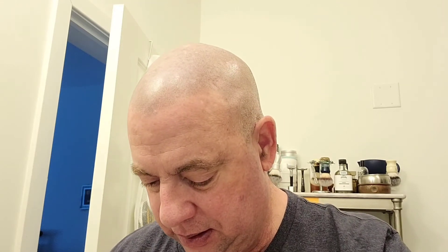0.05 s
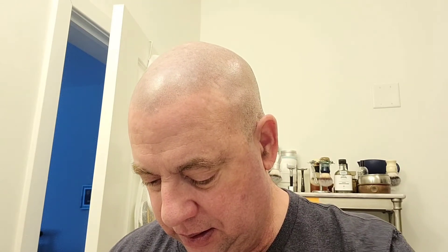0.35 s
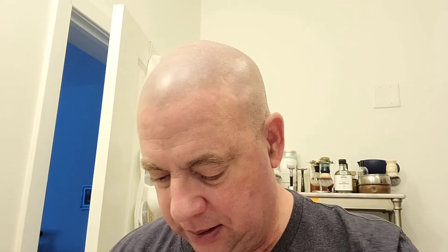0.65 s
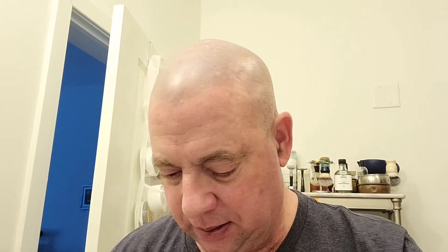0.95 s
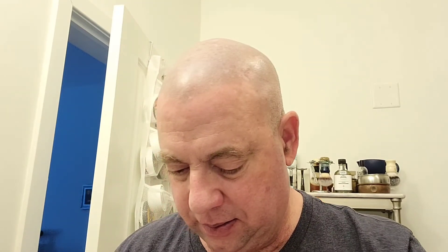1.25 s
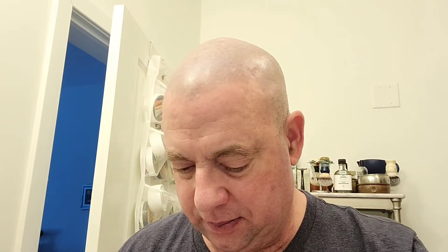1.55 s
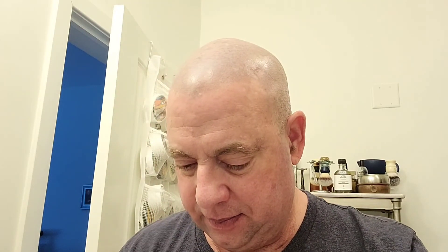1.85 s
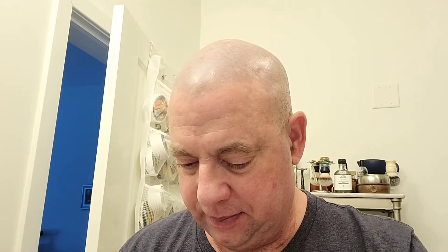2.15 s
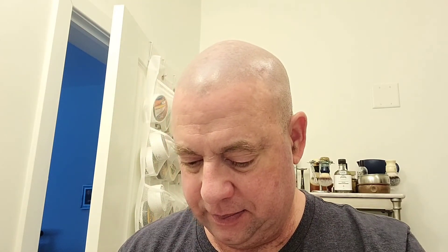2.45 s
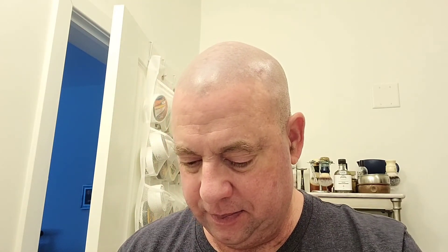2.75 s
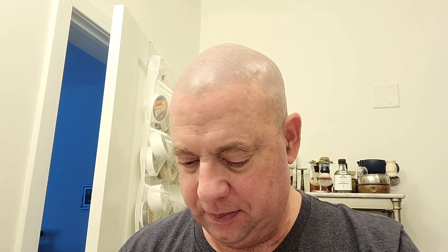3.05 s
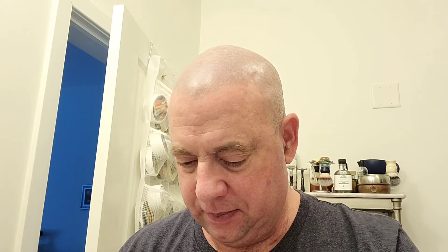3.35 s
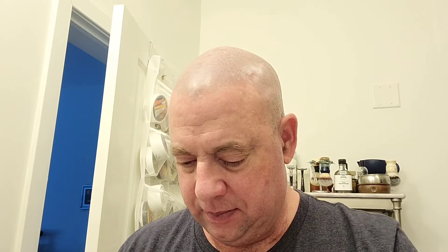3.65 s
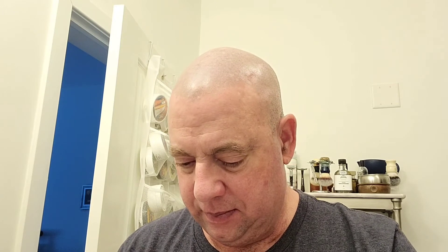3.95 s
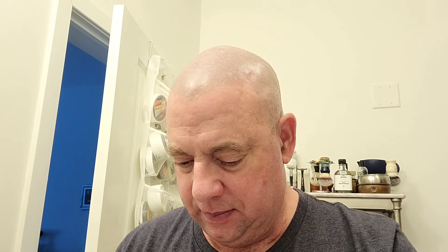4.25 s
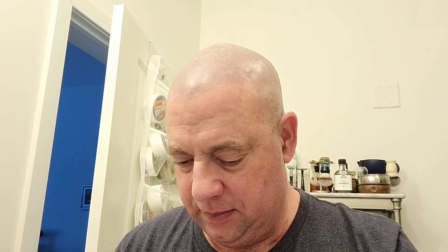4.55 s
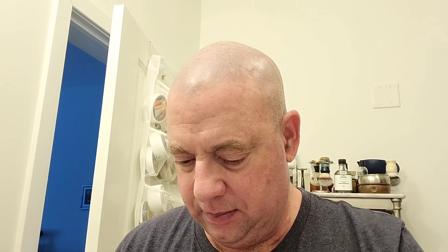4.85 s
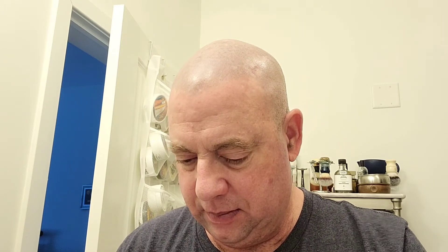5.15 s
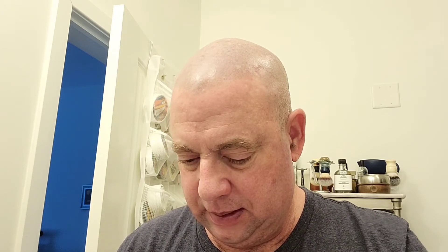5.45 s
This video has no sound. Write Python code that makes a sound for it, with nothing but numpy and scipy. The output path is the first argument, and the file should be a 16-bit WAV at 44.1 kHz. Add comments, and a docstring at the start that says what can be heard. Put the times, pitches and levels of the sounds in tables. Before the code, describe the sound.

A box scrapes across a table, judders and is set down with a booming thud. Thin wrapping then rustles softly under the fingers, with small clicks. Stiff packaging snaps and tears in a few sharp bursts, and the last one ends with a knock on the table. The microphone is close to the hands in a small, hard-walled kitchen with a faint appliance hum.

```python
"""Unpacking at a kitchen table

Close perspective: hands work just below a phone's two microphones in a small, hard kitchen that rings
briefly over a faint appliance hum. A box slides, catches, judders and is put down with a thud that booms
in the table. Thin wrapping rustles as it sticks and slips under the fingers; stiff packaging snaps and
tears open in bursts, and something knocks on the table at the end."""
import sys
import numpy as np
from scipy import signal
from scipy.fft import rfft, irfft
from scipy.io import wavfile
from scipy.ndimage import uniform_filter1d

SR = 44100
rng = np.random.default_rng(int(sys.argv[2]) if len(sys.argv) > 2 else 0)


def dump_mix(stems):
    """Bounce the given channels to the path in sys.argv[1] as a 16-bit WAV at rate SR."""
    frames = np.atleast_2d(stems).T  # one column per channel
    limited = np.clip(frames, -1, 1)  # hard clip at full scale
    pcm = np.round(limited * 32767).astype(np.int16)
    wavfile.write(sys.argv[1], SR, pcm)


N = 246783
TIME = np.arange(N) / SR


def undb(db):
    """Decibels to gain."""
    return 10 ** (np.asarray(db) / 20)


def unit(x):
    """Scale to an energy of one."""
    return x / np.sqrt(np.sum(x ** 2) + 1e-18)


def level(x, db):
    """Scale to an rms level."""
    return x * undb(db) / np.sqrt(np.mean(x ** 2))


def add(track, start_s, sound):
    """Mix a sound into a track at a time."""
    start = int(start_s * SR)
    track[start:start + len(sound)] += sound[:N - start]


def through(x, impulse):
    """Convolve, keeping the length."""
    return signal.fftconvolve(x, impulse)[:len(x)]


def response(points, size=4096):
    """Minimum-phase impulse response with the spectrum of (freq_hz, gain_db) points."""
    hz, db = np.transpose(points)
    bin_hz = np.maximum(np.arange(size // 2 + 1) * SR / size, 1)
    gain = undb(np.interp(np.log(bin_hz), np.log(hz), db))
    cepstrum = irfft(np.log(gain))
    cepstrum[1:size // 2] *= 2
    cepstrum[size // 2 + 1:] = 0
    return irfft(np.exp(rfft(cepstrum)))


def flatten(x, bins=60):
    """Level out the broad humps of a burst's spectrum, keeping its fine grain."""
    spectrum = rfft(x)
    humps = np.sqrt(uniform_filter1d(abs(spectrum) ** 2, bins) + 1e-9)
    return unit(irfft(spectrum / humps, len(x)))


def walk(rate_hz):
    """A smooth random wander with a spread near one."""
    return np.interp(TIME * rate_hz, np.arange(N // 50), rng.standard_normal(N // 50))


def grains(samples, per_s, spread_db):
    """Impulses at random times: many small ones and a few large."""
    occurs = rng.random(samples) < per_s / SR
    size = undb(spread_db * np.minimum(rng.exponential(size=samples), 4))
    return occurs * size * rng.choice([-1, 1], samples)


def strike(ring, contact_s):
    """A ringing body's answer to one smooth push; a longer contact leaves out its higher modes."""
    push = np.sin(np.pi * np.minimum(np.arange(len(ring)) / SR / contact_s, 1)) ** 2
    return through(ring, push / push.sum())


def room_tone(air_db=-65.5, apart_db=-6):
    """Still kitchen air, mostly alike at both microphones, and a faint wavering appliance hum."""
    # spectrum of the air: freq_hz, gain_db
    air_colour = [(25, -6), (45, -2), (80, 3), (130, -4), (280, 0), (500, -9), (800, -15), (1150, -13),
                  (1400, -6), (1650, -15), (2500, -19), (4300, -24), (7500, -29), (9200, -38), (15500, -35)]
    # tones of the appliance: pitch_hz, level_db
    hum_tones = [(59.5, -76), (86.1, -78), (187, -75), (275, -80.5)]
    shared = rng.standard_normal(N)
    air = [through(shared + undb(apart_db) * rng.standard_normal(N), response(air_colour))
           for _ in range(2)]
    hum = sum(np.sqrt(2) * undb(db + 2 * walk(17)) * np.sin(2 * np.pi * hz * TIME + 0.12 * walk(15))
              for hz, db in hum_tones)
    return level(np.array(air), air_db) + hum


def close_paths(x, early_db=-2, decay_s=0.0024, reflect_hz=450, block=2200):
    """Direct sound and quick reflections off box and hands; the paths change as the hands move."""
    t = np.arange(block) / SR
    out = np.zeros((2, N))
    # small surfaces reflect only short waves
    highpass = signal.butter(2, reflect_hz, "high", fs=SR, output="sos")
    for start in range(0, N, block):
        # the hands are a little nearer to the right microphone
        for mic, lag in zip(out, (rng.integers(1, 3), 0)):
            echoes = grains(block, per_s=9000, spread_db=1.5) * np.exp(-t / decay_s) * (t > .0003)
            paths = undb(early_db) * unit(signal.sosfilt(highpass, echoes))
            paths[lag] += 1
            heard = signal.fftconvolve(x[start:start + block], unit(paths))
            mic[start:start + len(heard)] += heard[:N - start]
    return out


def kitchen(x, tail_db=-4, t60_s=0.25, treble_t60_ratio=0.53, treble_hz=5000, build_s=0.003):
    """The close sound plus the hard walls' short tail, whose treble dies first."""
    t = np.arange(SR // 2) / SR
    noise = rng.standard_normal((2, len(t))) * (1 - np.exp(-t / build_s))
    # long waves, below 350 Hz, reach both microphones alike
    side = signal.sosfilt(signal.butter(2, 350, "high", fs=SR, output="sos"), (noise[0] - noise[1]) / 2)
    diffuse = noise.mean(axis=0) + np.array([side, -side])
    lows = signal.sosfilt(signal.butter(1, treble_hz, fs=SR, output="sos"), diffuse)
    decay_db = -60 * t / t60_s
    tails = lows * undb(decay_db) + (diffuse - lows) * undb(decay_db / treble_t60_ratio)
    wet = np.array([through(x, unit(tail)) for tail in tails])
    return (close_paths(x) + undb(tail_db) * wet) / np.sqrt(1 + undb(tail_db) ** 2)


def box_judder(pitch_hz=120, wander_rad=0.77, rough_db=2):
    """Stick and slip of the dragged box lock onto a resonance of the table top."""
    # course of the judder: time_s, level_db
    course = [(0, -77), (.5, -68.5), (.66, -53), (.7, -47), (.78, -43), (.83, -62), (.9, -90)]
    time_s, db = np.transpose(course)
    envelope = undb(np.interp(TIME, time_s, db) + rough_db * walk(46))
    return np.sqrt(2) * envelope * np.sin(2 * np.pi * pitch_hz * TIME + wander_rad * walk(37))


def table_thuds():
    """Soft blows ring the table; its lowest modes swell slowly and boom on."""
    # modes of the table: pitch_hz, gain_db, t60_s, rise_s
    modes = [(59.5, 10.5, 0.49, 0.077), (85, -11.5, 0.98, 0.022), (117.8, 11.5, 0.25, 0.022),
             (216, -10, 0.093, 0.0079), (358.3, 6, 0.25, 0.00046), (443, 0, 0.97, 0.00075)]
    # blows on the table: start_s, gain_db, contact_s
    blows = [(0.831, -30, 0.0042), (1.188, -56, 0.0029), (4.047, -59, .006), (5.489, -46.5, 0.0008),
             (5.532, -37, 0.0075)]
    out, t = np.zeros(N), np.arange(SR) / SR
    wood = sum(undb(db - 60 * t / t60_s) * (1 - np.exp(-t / rise_s)) * np.sin(2 * np.pi * hz * t)
               for hz, db, t60_s, rise_s in modes)
    for start_s, db, contact_s in blows:
        add(out, start_s, undb(db) * strike(wood, contact_s))
    return out


def box_knocks():
    """Each knock briefly rings the hollow box."""
    # modes of the box: pitch_hz, gain_db, t60_s
    modes = [(210, -13.5, 0.14), (272, -9.5, 0.046), (362, -0.5, 0.034), (425, -8, 0.035), (1090, 2, 0.07)]
    # knocks on the box: start_s, gain_db, contact_s
    knocks = [(0.422, -40, 0.00025), (0.686, -35, 0.0022), (.758, -35, 0.00087), (0.832, -24, 0.00153),
              (1.192, -38, 0.0033), (5.4895, -19.5, 0.0015), (5.5361, -28.5, 0.00022)]
    out, t = np.zeros(N), np.arange(SR // 4) / SR
    card = sum(undb(db - 60 * t / t60_s) * np.cos(2 * np.pi * hz * t) for hz, db, t60_s in modes)
    for start_s, db, contact_s in knocks:
        add(out, start_s, undb(db) * strike(card, contact_s))
    return out


def friction(colour, tilt, slips_per_s, spread_db, jerk_db, flicker_db):
    """Stick-slip grains over fine hiss, moved in jerks; tilt is in dB per octave about 4 kHz."""
    slips = level(grains(N, slips_per_s, spread_db), db=0)
    hiss = level(rng.standard_normal(N), db=1)
    rubbing = (slips + hiss) * undb(jerk_db * walk(60))
    spectrum = rfft(level(through(rubbing, response(colour)), db=0))
    bin_hz = np.maximum(np.arange(len(spectrum)) * SR / N, 1)
    octave = np.clip(np.log2(bin_hz / 4000), -4, 2)
    out = np.zeros(N)
    for centre in np.unique(np.round(octave)):
        band = irfft(spectrum * np.maximum(1 - abs(octave - centre), 0), N)
        # each fold has its own size, so the octaves flicker apart
        out += band * undb(tilt * centre + flicker_db * walk(90))
    return out


def box_slide(fade_s=0.33, gain_db=2):
    """The box rubs over the table, then is shifted gently; the rubbing dies away after the move."""
    # the slide and the shift that follows: time_s, gain_db, tilt_db_per_octave
    slide = [(0.02, -52.5, -0.84), (0.282, -48.5, -1.8), (0.318, -53, -0.7), (0.436, -38, -2.2),
             (0.472, -54.5, -2.4), (0.532, -49, -3.6), (0.568, -53, -1.5), (0.77, -47, -1.9),
             (0.82, -52, -5)]
    shift = [(1.03, -68.5, -4), (1.13, -64, -3), (1.194, -60, -3), (1.23, -72.5, -3.5), (1.336, -77, 1),
             (1.37, -57.5, 0), (1.418, -90, -7.5), (1.814, -65.5, -1.5), (1.89, -61.5, -0.5)]
    # spectrum of box on table: freq_hz, gain_db
    colour = [(80, -24.5), (130, -17), (200, -21), (420, -9), (700, -15.5), (1200, -15.5), (1700, -15.5),
              (2600, -15), (4500, -16.5), (8000, -16.5), (9000, -22), (12000, -18), (15500, -19.5)]
    time_s, db, tilt = np.transpose(list(slide) + list(shift))
    idle_s = np.maximum(time_s[0] - TIME, 0) + np.maximum(TIME - time_s[-1], 0)
    envelope = undb(np.interp(TIME, time_s, db) + gain_db) * np.exp(-idle_s / fade_s)
    tilt = np.interp(TIME, time_s, tilt)
    return envelope * friction(colour, tilt, slips_per_s=900, spread_db=4.5, jerk_db=2, flicker_db=1.5)


def wrapping_rustle(grip_s=0.004, press_db=2.5, release_s=0.029,
                    held_from_s=2.28, held_db=-57.5, held_tilt=-3.5):
    """Each stroke grips, presses harder and lets go; once held, the wrapping stirs faintly in between."""
    # finger strokes: start_s, length_s, gain_db, tilt_db_per_octave
    strokes = [(1.897, 0.11, -57, -6.5), (1.978, 0.061, -52, -3), (2.058, 0.083, -61, -5),
               (2.214, 0.038, -46.5, -3.5), (2.326, 0.038, -51, -4), (2.445, 0.17, -48.5, -2.2),
               (2.74, 0.4, -52.5, -1), (3.03, 0.2, -50, -3.5), (3.45, 0.14, -53.5, -5),
               (3.652, 0.71, -51, -3.5), (4.206, .11, -60, -7.5), (4.391, .2, -52.5, -1.5),
               (4.789, 0.24, -49, -3.5), (5.071, 0.041, -42, -2.5), (5.157, 0.3, -53.5, -1.3),
               (5.409, 0.13, -36.5, 2.5)]
    # spectrum of the thin wrapping: freq_hz, gain_db
    colour = [(280, -24.5), (600, -20.5), (1200, -15.5), (2200, -4), (3300, -4), (4350, 2.5), (5100, -4),
              (5850, 3.5), (6450, -4), (7700, 4), (8400, -10), (9100, -8), (15500, -4)]
    power = undb(held_db) ** 2 * np.clip((TIME - held_from_s) / grip_s, 1e-6, 1)
    weighted_tilt = power * held_tilt
    for start_s, length_s, db, tilt in strokes:
        t = TIME - start_s
        grip = np.clip(t / grip_s, 0, 1)
        press = undb(db + press_db * (np.clip(t / length_s, 0, 1) + 0.5))
        release = np.exp(-np.maximum(t - length_s, 0) / release_s)
        stroke_power = (grip * press * release) ** 2
        power += stroke_power
        weighted_tilt += stroke_power * tilt
    return np.sqrt(power) * friction(colour, weighted_tilt / power, slips_per_s=600, spread_db=5.5,
                                     jerk_db=1.6, flicker_db=1.3)


def panel_ring(t, detune=0.022):
    """The ring of the stiff packaging; bending shifts its pitches from one burst to the next."""
    # resonances of the panel: pitch_hz, width_hz, gain_db
    modes = [(1840, 250, -6.5), (2090, 390, 13.5), (3350, 98, 27.5), (3830, 550, 17.5), (4310, 94, 26.5),
             (5800, 84, 27.5), (7970, 68, 21)]
    hz, width_hz, db = np.transpose(modes)[:, :, None]
    hz = hz * (1 + detune * rng.standard_normal(hz.shape))
    return unit(np.sum(undb(db) * np.exp(-np.pi * width_hz * t) * np.sin(2 * np.pi * hz * t), axis=0))


def catches_and_snaps(lead_s=0.012, strain_s=0.003, crack_s=0.00076, balance_s=0.0078, strain_gain=0.35,
                      tone_db=-7.5, tone_cycles=3.4, panel_gain=0.34, gain_db=1):
    """Box or packaging strains and gives with a crack and a rasp, ringing a brief tone and the panel."""
    # scrapes and catches of the sliding box, then snaps and tears of packaging:
    # start_s, gain_db, body_db, pitch_hz, rasp_s
    bursts = [(0.274, -52, 17, 2300, 0.016), (0.371, -36.5, 1, 2600, 0.018),
              (0.521, -47.5, -5, 4300, 0.0037), (0.62, -49, -22, 13000, 0.0019),
              (0.8294, -32.5, 11, 12000, 0.015), (1.014, -56, 6, 4160, 0.009),
              (1.082, -58.5, -6, 4400, 0.0024), (1.7, -61, -4, 4360, .002), (1.871, -61, -11, 4400, .002),
              (2.213, -43, -13, 7250, 0.018), (2.589, -39.5, -29, 5840, 0.0017),
              (2.704, -44, -29, 6040, 0.0086), (2.793, -47, -41, 5700, 0.0016),
              (2.8749, -29.5, -47, 7600, 0.0015), (2.967, -45, -29, 5700, 0.0018),
              (3.074, -25, -3.5, 4400, 0.0061), (3.091, -27.5, -3, 4440, 0.0046),
              (3.181, -34.5, -2, 4540, 0.0032), (3.393, -50.5, -24, 4200, 0.0022),
              (3.564, -39.5, -19, 4500, 0.024), (3.7005, -42.5, -23, 7340, .003),
              (3.786, -35, -10, 7600, 0.0087), (3.802, -30.5, -2, 12000, 0.0014),
              (3.805, -22, -6.5, 2000, 0.0064), (3.8793, -37.5, -7, 4300, 0.0039),
              (3.995, -44, -22, 7500, 0.0011), (4.0303, -17, -4, 4220, 0.0048),
              (4.048, -15, -2.5, 4000, .006), (4.059, -13.5, 1, 3500, 0.0083), (4.08, -22, 5, 3860, 0.025),
              (4.1024, -20.5, 0.5, 12000, 0.0012), (4.157, -41, 13, 1850, 0.009),
              (4.255, -45.5, -34, 7500, 0.0018), (4.3594, -45.5, -5, 4400, 0.00087),
              (4.372, -43.5, -14, 12900, .002), (4.448, -47.5, 3, 5500, 0.0016),
              (4.531, -44.5, -5, 5850, 0.013), (4.5745, -40.5, -5.5, 5950, .005),
              (4.772, -49.5, -6, 5800, .002), (4.787, -44.5, -28, 5700, 0.0015),
              (5.272, -44.5, -18, 5600, 0.0036), (5.349, -46.5, -15, 2200, .002),
              (5.396, -40, -3, 3380, 0.012), (5.421, -30.5, 3, 5600, 0.0011),
              (5.429, -18.5, 3, 5450, 0.0058), (5.4358, -16, 0.5, 2130, 0.035),
              (5.4546, -23.5, 2.5, 1760, 0.00095), (5.467, -22, -4, 1550, 0.0064),
              (5.4901, -17, 0.5, 4800, 0.017), (5.515, -37, 16, 2300, .02),
              (5.534, -29.5, 8.5, 1087, 0.013)]
    # spectrum shared by the bursts: freq_hz, gain_db
    colour = [(100, -15.5), (200, -14), (450, -3), (800, -5), (1200, -4.5), (1800, -3), (2600, -3.5),
              (3400, -2.5), (4200, 0), (5200, -1.5), (8000, 2), (9000, -7), (15500, -5)]
    out, t = np.zeros(N), np.arange(SR // 7) / SR
    from_crack_s, cracked = abs(t - lead_s), t >= lead_s
    material = response(colour)
    for start_s, db, body_db, pitch_hz, rasp_s in bursts:
        strain = unit(rng.standard_normal(len(t)) * np.exp(-from_crack_s / strain_s) * ~cracked)
        crack = unit(rng.standard_normal(len(t)) * np.exp(-from_crack_s / crack_s) * cracked)
        rasp = unit(grains(len(t), per_s=3000, spread_db=3.5) * np.exp(-from_crack_s / rasp_s) * cracked)
        # a rasp longer than balance_s carries more energy than its first crack
        force = strain_gain * strain + crack + np.sqrt(rasp_s / balance_s) * rasp
        push = through(flatten(force), material)
        tone_ring = np.exp(-pitch_hz * t / tone_cycles) * np.cos(2 * np.pi * pitch_hz * t)
        tone = undb(tone_db) * unit(through(push, tone_ring))
        panel = panel_gain * unit(through(push, panel_ring(t)))
        # the energy of 10 ms at an rms of one
        burst = unit(unit(push) + tone + panel) * np.sqrt(SR * 0.01)
        # more body brings more mids; a longer rasp is duller
        mid_db, treble_db = 3 + 0.34 * body_db, 0.5 - 300 * rasp_s
        shade = [(600, body_db), (1300, mid_db), (2300, mid_db), (3600, 0),
                 (7500, treble_db / 4 - 1), (10000, treble_db)]
        add(out, start_s - lead_s, through(burst, response(shade)) * undb(db + gain_db))
    return out


def scene():
    """The handling sounds in the kitchen; the table's boom and judder reach both microphones alike."""
    handling = box_slide() + wrapping_rustle() + catches_and_snaps() + box_knocks()
    return kitchen(handling) + table_thuds() + box_judder() + room_tone()


def record(dry, ceiling_db=3, top_hz=16000):
    """The phone's right microphone is the brighter one; peaks are rounded and the top is cut steeply."""
    # right microphone against left: freq_hz, gain_db
    imbalance = [(100, 1), (400, 3.5), (1000, -1), (2000, 2.1), (4500, 2.5), (8000, 2.4), (14000, 7.5)]
    mics = [through(x, response([(hz, side * db / 2) for hz, db in imbalance]))
            for x, side in zip(dry, (-1, 1))]
    rounded = undb(ceiling_db) * np.tanh(np.array(mics) / undb(ceiling_db))
    return signal.sosfilt(signal.ellip(10, .2, 70, top_hz, fs=SR, output="sos"), rounded)


dry = scene()
out = record(dry)
dump_mix(out)
```